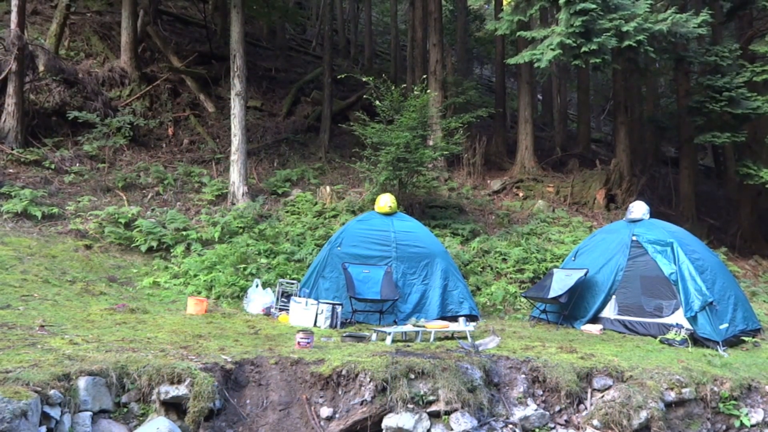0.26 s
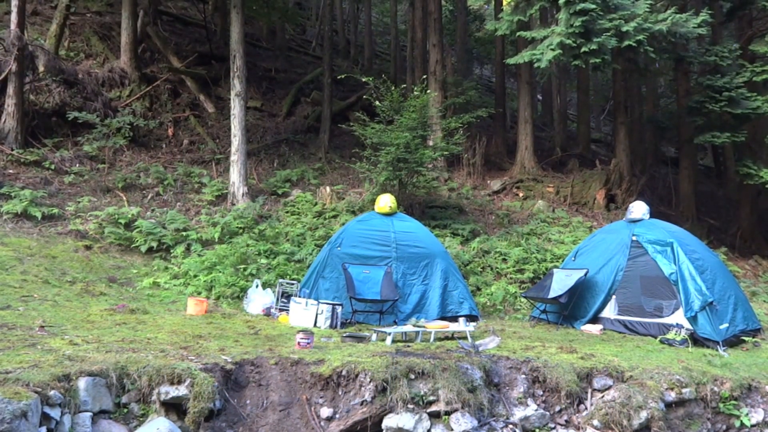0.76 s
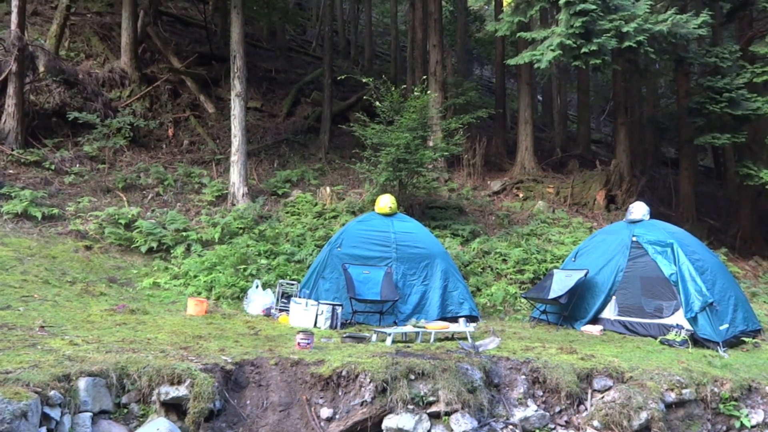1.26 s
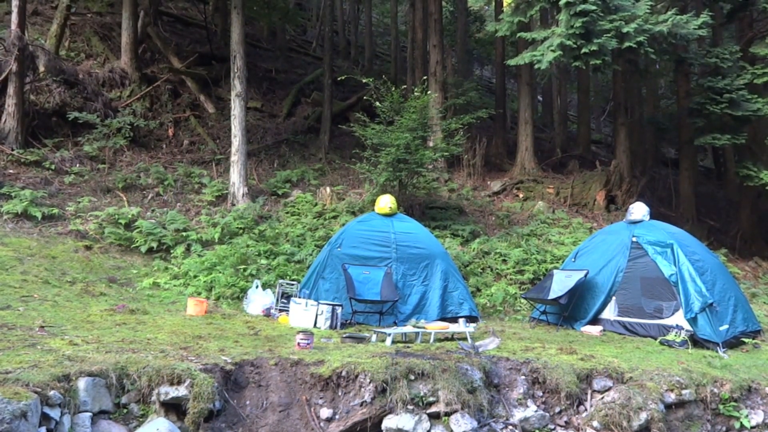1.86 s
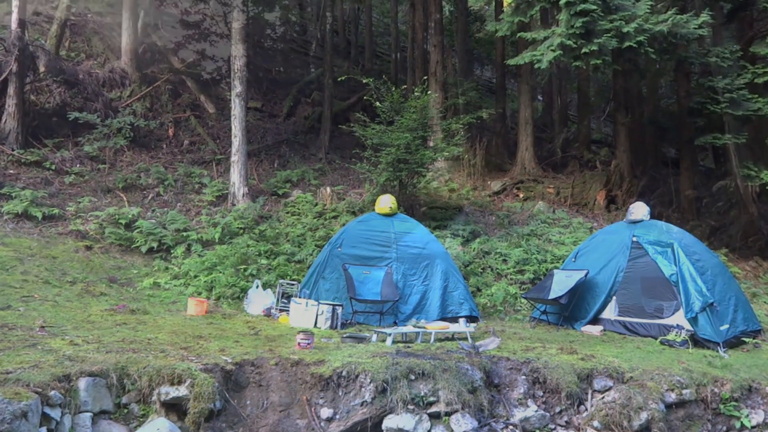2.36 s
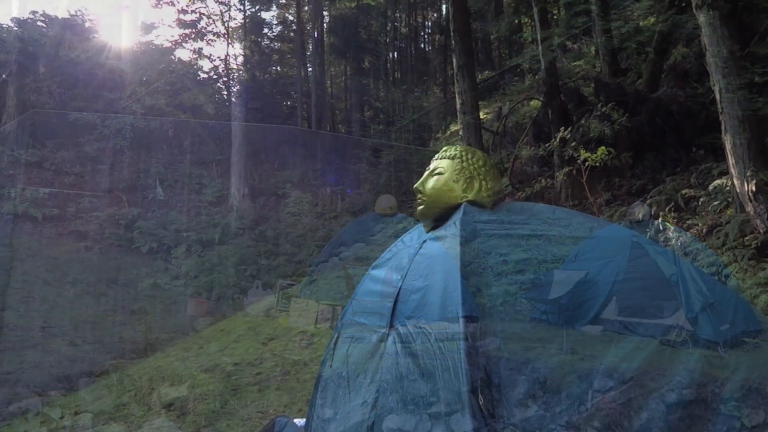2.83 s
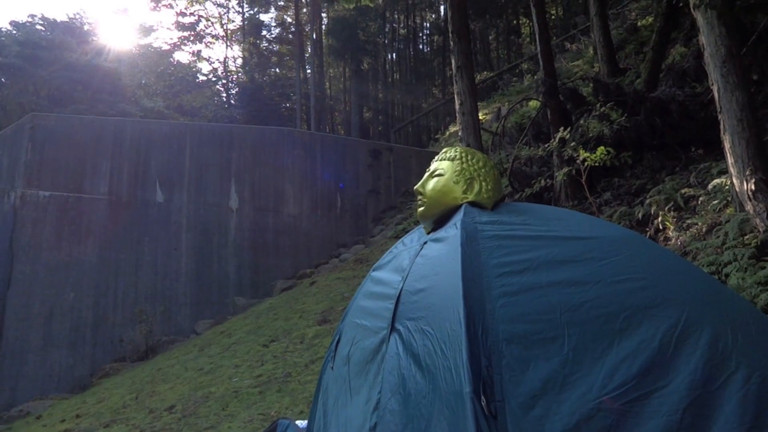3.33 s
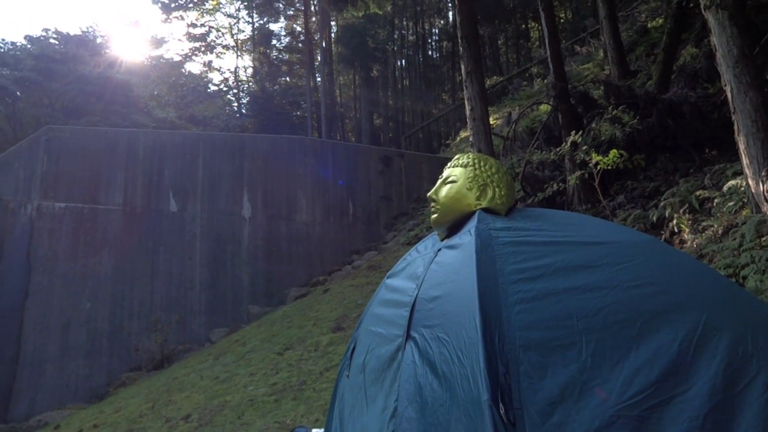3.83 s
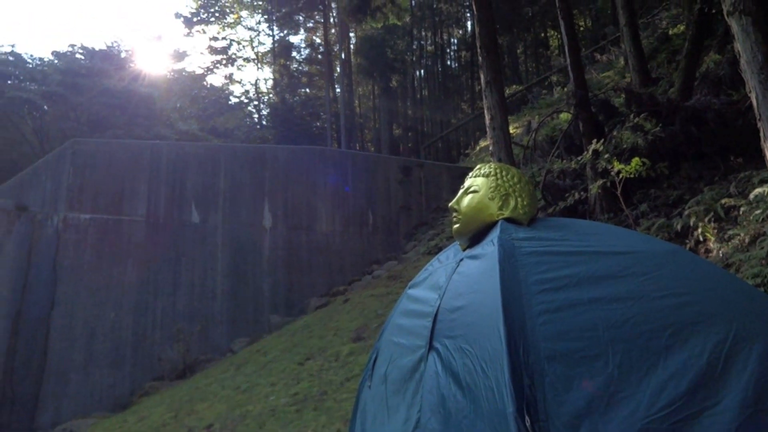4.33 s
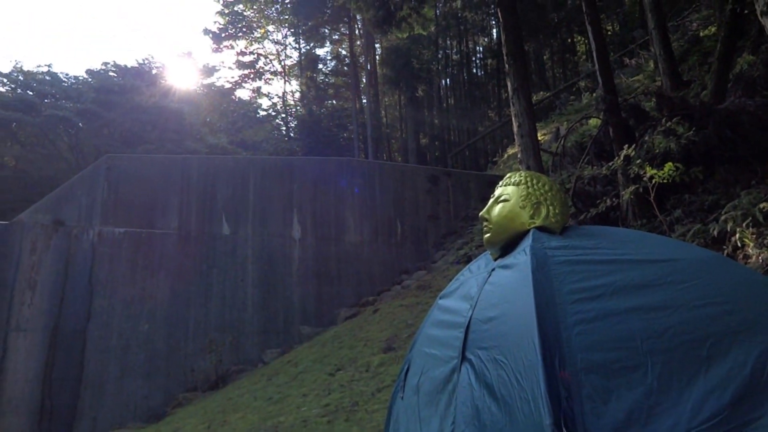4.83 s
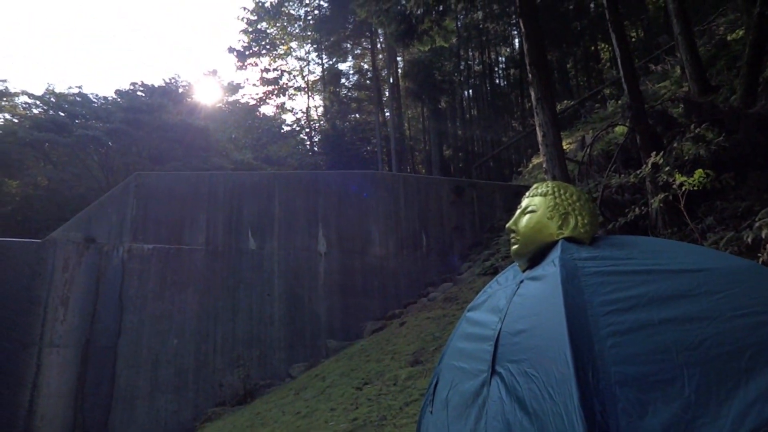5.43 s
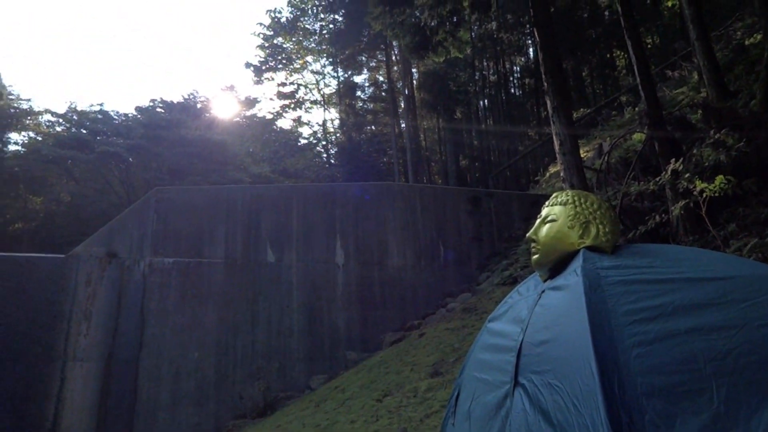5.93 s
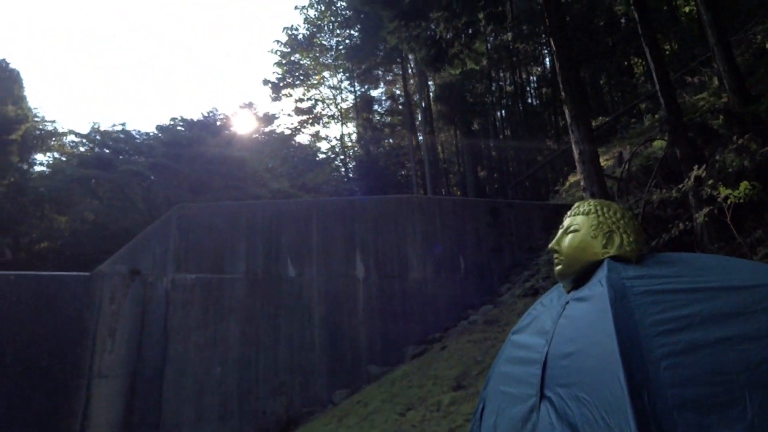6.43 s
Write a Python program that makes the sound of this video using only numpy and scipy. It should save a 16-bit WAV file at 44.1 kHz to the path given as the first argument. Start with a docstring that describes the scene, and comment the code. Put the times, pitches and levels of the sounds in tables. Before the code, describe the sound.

A rocky mountain stream rushes and gurgles close by with bright plops and splashes, then fades over to a quieter, smoother, more distant rush.

```python
"""Mountain stream over rocks

A rush is heard from close by, then fades over to a quieter, more distant spot; churning water joins there.
Each rush is filtered noise (white water) plus a swarm of decaying, gliding sines (air bubbles).
Single plops, rising glugs and splashes, made of sines and short noise bursts, stand out.
A stereo pair of microphone ports hears it, a little stronger on the left."""
import sys
import numpy as np
from scipy import signal
from scipy.fft import rfft, irfft
from scipy.io import wavfile

SR = 44100
rng = np.random.default_rng(int(sys.argv[2]) if len(sys.argv) > 2 else 0)


def put_to_file(sound):
    """Save the sound as 16-bit audio at rate SR, in the file named by the first command-line argument."""
    columns = np.atleast_2d(sound).T  # one column per channel
    safe = np.clip(columns, -1, 1)
    whole_steps = np.round(safe * 32767)
    wavfile.write(sys.argv[1], SR, whole_steps.astype(np.int16))


N = 294588
HZ = np.fft.rfftfreq(N, 1 / SR)

# how the two ports hear the distant spot:
# (frequency [Hz], coherence [0-1], left minus right [dB], phase lead of the left [rad])
FAR_IMAGE = [(60, 0.35, 1, 0.5), (308, 0.63, 1.5, 1), (513, 0.14, 2.5, -1.5), (810, 0.71, 3.8, 0.36),
             (1133, 1, 1, -1.3), (1430, 0.28, 4.3, 2.5), (1540, 0.52, 6.8, 3.5), (1970, 0.69, 6.8, 4),
             (2370, 0.76, 2.8, 6.5), (3020, 0.79, 3.5, 6), (4600, 1, 2.9, 6.5), (9000, 1, 3.8, 6.5),
             (15000, 1, 1.2, 6.5)]


def gain_of(db):
    """Decibel law: 20 dB is a factor of ten in amplitude."""
    return 10 ** (np.asarray(db) / 20)


def evened(x):
    """Normalization to unit rms."""
    return x / np.sqrt(np.mean(x ** 2) + 1e-20)


def read(table, hz):
    """Linear interpolation of every table column along a log-frequency axis."""
    f, *columns = np.transpose(table)
    return [np.interp(np.log(hz + 1), np.log(f + 1), column) for column in columns]


def add(mix, s, sound):
    """Superposition: adds a sound to the mix, in place, from time s."""
    part = mix[max(round(s * SR), 0):][:len(sound)]
    part += sound[:len(part)]


def ramp(start_s, length_s):
    """Linear amplitude rise from 0 to 1, which then holds."""
    return np.clip((np.arange(N) / SR - start_s) / length_s, 0, 1)


def lumps(shape, span_s, span_hz):
    """Gaussian-smoothed random field of unit rms over time frames and frequency bins."""
    along_s = np.fft.fftfreq(shape[0], 128 / SR)[:, None] * span_s
    along_hz = np.fft.fftfreq(shape[1], SR / 512) * span_hz
    blur = np.exp(-along_s ** 2 - along_hz ** 2)
    spectrum = np.fft.fft2(rng.standard_normal(shape))
    return evened(np.fft.ifft2(spectrum * blur).real)


def froth(patchy_db, flicker_db, surge_db):
    """Modulated noise: two independent strands share patches of spray, quick flicker and slower surges."""
    shape = (N // 128 + 5, 257)
    # each depth is the rms level swing; its sign does not matter
    level_db = patchy_db * lumps(shape, span_s=0.042, span_hz=940)
    level_db = level_db + flicker_db * lumps(shape, span_s=0.0059, span_hz=9300)
    level_db = level_db + surge_db * lumps(shape, span_s=0.1, span_hz=11000)
    noise = rng.standard_normal((2, *shape)) + 1j * rng.standard_normal((2, *shape))
    spectrogram = np.swapaxes(noise * gain_of(level_db), 1, 2)
    strands = signal.istft(spectrogram, nperseg=512, noverlap=384)[1]
    return evened(strands[:, :N])


def bubble(hz, t60, rise=0.057, onset_cycles=2.4):
    """Bubble resonance: trapped air rings and decays, its pitch rising as it nears the surface."""
    t = np.arange(0, t60, 1 / SR)
    decay = gain_of(-60 * t / t60)
    onset = 1 - np.exp(-t * hz / onset_cycles)
    # the pitch climbs by twice the rise, as a share of hz
    cycles = hz * t * (1 + rise * (t / t60 - .5))
    return decay * onset * np.sin(2 * np.pi * cycles)


def swarm(lo_hz, hi_hz, per_s, spread_db, cycles, glide=0.1, count=70):
    """Random superposition: bubbles of many sizes and strengths give even power per hertz."""
    out = np.zeros(N)
    per_pitch = int(np.clip(per_s * N / SR / count, 1, 400))
    for hz in np.geomspace(lo_hz, hi_hz, count):
        when, strength, polarity = rng.random((3, per_pitch))
        # exponential levels: a positive spread makes a few strong, a negative one a few faint
        level_db = spread_db * np.minimum(-np.log(1 - strength), 4)
        size = gain_of(level_db) * np.sign(polarity - .5)
        clicks = np.bincount((when * N).astype(int), size, N)
        ring = bubble(hz, cycles * rng.uniform(0.49, 1.25) / hz, glide * rng.random())
        # log-spaced pitches need power in proportion to frequency
        out += signal.oaconvolve(clicks, np.sqrt(hz) * ring / np.linalg.norm(ring))[:N]
    return evened(out) * np.sqrt(2 * (hi_hz - lo_hz) / SR)


def banks(x, wet_db=-10, t60=0.1):
    """Diffuse scattering: rocks and banks put a short, decaying noise tail behind each sound."""
    t = np.arange(SR // 3) / SR
    tail = rng.standard_normal(len(t)) * gain_of(-60 * t / t60)
    tail = tail * (1 - np.exp(-t / 0.0089))
    return x + gain_of(wet_db) * signal.oaconvolve(x, tail / np.linalg.norm(tail))[:N]


def colour(wash, rocks):
    """Spectral shaping: the broad wash curve with peaks and notches from echoes between the rocks."""
    level_db = read(wash, HZ)[0]
    for hz, width, db in rocks:
        level_db = level_db + db * np.exp(-((HZ - hz) / width) ** 2)
    return gain_of(level_db)


def ports(shared, diffuse, image):
    """Interchannel coherence: both ports hear the shared sound alike, the diffuse one in opposition."""
    alike, balance_db, lead = read(image, HZ)
    alike = np.clip(alike, 0, .998)
    mid = rfft(shared) * np.sqrt(1 + alike)
    side = rfft(diffuse) * np.sqrt(1 - alike)
    left_gain = gain_of(balance_db)
    left = (mid + side) * left_gain
    right = (mid - side) * np.exp(-1j * lead)
    return irfft(np.array([left, right]) / np.sqrt(1 + left_gain ** 2), N)


def stream(foam, bubbles, tone, image):
    """Linear filtering: foam and bubbles take the tone and stereo image of one spot, at unit rms."""
    foam = foam + np.array([banks(bubbles), np.zeros(N)])
    shared, diffuse = irfft(rfft(foam) * tone, N)
    return evened(ports(shared, diffuse, image))


def near_stream():
    """Noise and bubble resonance close by: low gurgling, a thin trickle and bright tinkling in the rush."""
    # white water spectrum: (frequency [Hz], relative level per hertz [dB])
    near_wash = [(30, -40), (130, -35), (260, -23), (380, -11.5), (820, -1), (1320, -2.5), (1530, 0.8),
                 (2000, -4), (2900, -5.5), (3600, -3.5), (4800, -7.5), (7000, -8.5), (10000, -14.5),
                 (15000, -28.5)]
    # peaks and notches from rock echoes: (frequency [Hz], half width to 1/e [Hz], level [dB])
    near_rocks = [(685, 59, -1.5), (834, 60, 0), (970, 34, 1), (1350, 70, -1.5), (2400, 240, 1),
                  (3170, 85, -1), (3590, 30, 3.5), (3940, 95, 2), (4600, 220, -1.6), (5300, 190, 2.5),
                  (8700, 220, 1)]
    # hearing at the ports:
    # (frequency [Hz], coherence [0-1], left minus right [dB], phase lead of the left [rad])
    near_image = [(60, 0.35, 0.6, 0.09), (380, 0.77, 1.5, -0.1), (1030, 0.96, 1.5, -0.23),
                  (1280, 0.8, 2.5, -0.29), (1560, 0.08, 6, -0.7), (1990, 0.56, 1.5, -0.4),
                  (2300, 0.97, 3.4, 0.1), (2780, 0.62, 4.9, -0.61), (3620, 0.91, 4, 0),
                  (6800, 0.97, 6.5, -0.01), (8700, 0.83, 6, -0.3), (10800, 0.29, 5, -0.18),
                  (13900, 1, -0.6, -0.01)]
    gurgle = gain_of(-5.5) * swarm(318.0, 2005, per_s=330, spread_db=2.0, cycles=18.4, glide=0.34)
    trickle = gain_of(-10.5) * swarm(3380, 4160, per_s=80, spread_db=-0.3, cycles=130, count=14)
    tinkle = gain_of(-11.0) * swarm(1970, 8980, per_s=700, spread_db=2.0, cycles=36)
    foam = froth(patchy_db=1.0, flicker_db=1.12, surge_db=-0.2)
    tone = colour(near_wash, near_rocks)
    return gain_of(-35.5) * stream(foam, gurgle + trickle + tinkle, tone, near_image)


def plop(db, hz, rise=0.065):
    """Bubble damping: the lower the pitch of a large bubble, the longer it rings."""
    t60_at_1khz, size_power = 0.061, 0.36
    return gain_of(db) * bubble(hz, t60_at_1khz * (hz / 1000) ** -size_power, rise)


def plops():
    """Bubble resonance: the largest bubbles ring one by one."""
    # (time [s], level [dB], pitch [Hz], half the upward glide [share of pitch])
    large_bubbles = [(.03, -29.5, 897, .04), (.078, -39, 3100, .04), (.083, -27.5, 2240, .2),
                     (.086, -38, 524, 0.11), (.091, -31, 2580, .08), (.163, -29, 840, 0.072),
                     (.183, -34, 846, .04), (.22, -29, 2090, .04), (.29, -30, 794, .04),
                     (.479, -26, 2350, 0.044), (.506, -34, 1510, .08), (.607, -29.5, 802, .04),
                     (.617, -30, 845, 0.039), (.65, -36, 520, .06), (.673, -30, 2560, 0.19),
                     (.68, -32, 920, 0.16), (.711, -29, 850, .04), (.979, -33.5, 534, .04),
                     (.982, -32, 840, .04), (1.085, -33, 650, .08), (1.091, -34, 1910, .04),
                     (1.141, -28.5, 1180, 0.093), (1.163, -33, 1520, .04), (1.203, -33, 1000, .04),
                     (1.259, -29.5, 3800, .02), (1.263, -31, 2220, .04), (1.345, -36, 2620, .04),
                     (1.386, -30.5, 2260, .08), (1.502, -32.5, 1640, .04), (1.706, -42, 450, .06),
                     (1.772, -28.5, 867, .04), (1.952, -28.5, 952, .04), (2.079, -33, 2360, .04),
                     (2.222, -37.5, 553, .04), (2.26, -32, 2390, .04), (2.325, -29, 3650, .04),
                     (2.386, -32, 3960, .04), (2.903, -36, 810, 0.034), (3.144, -45, 1750, .04),
                     (3.182, -40, 773, .08), (3.234, -40, 910, .04), (3.248, -45, 3120, .04),
                     (3.268, -41, 1740, 0.054), (3.27, -44, 2330, .06), (3.311, -36, 1290, .06),
                     (3.648, -41, 790, 0.043), (3.93, -41, 720, .04), (4.165, -41, 860, .04),
                     (4.203, -35.5, 915, .08), (4.239, -40, 1114, .06), (4.313, -41, 1636, .04),
                     (4.372, -42, 1465, .06), (4.516, -37, 1780, .04), (4.97, -37.5, 770, 0.051),
                     (5.044, -40, 900, .04), (5.211, -36, 1295, .04), (5.253, -41, 1465, .06),
                     (5.28, -42, 2025, .04), (5.478, -41, 1035, .06), (5.583, -38, 1545, .04),
                     (5.629, -38, 3050, .04), (5.66, -43, 3100, .04), (5.778, -42, 820, .06),
                     (5.955, -40, 2560, .04), (6.054, -39, 905, .06), (6.417, -39, 1700, .04),
                     (6.555, -35, 1225, .04)]
    out = np.zeros(N)
    for s, db, hz, rise in large_bubbles:
        add(out, s, plop(db, hz, rise))
    return out


def stray_plops(per_s, db, hz, octaves, spread_db=3.0, count=60):
    """Random arrivals: lesser plops after gamma-distributed waits, scattered in level and pitch."""
    out = np.zeros(N)
    waits = rng.gamma(2, 1 / 2, count) / per_s
    scatter = rng.uniform(-0.67, 1, (count, 2))
    for s, (strength, height) in zip(np.cumsum(waits), scatter):
        add(out, s, plop(db + spread_db * strength, hz * 2 ** (octaves * height)))
    return out


def panned(sound, pan_db):
    """Level-difference panning: positive leans left, with a faint tail from the banks."""
    port = gain_of([[pan_db / 2], [-pan_db / 2]])
    return port / np.sqrt(np.mean(port ** 2)) * banks(sound, wet_db=-20)


def splash(hz, length, octaves, count=8):
    """Impact noise: a slap swells quickly as band-limited spray, with droplets ringing in it."""
    droplet_share, droplet_cycles = 0.26, 41  # share of the power; cycles to fall 60 dB
    u = np.arange(SR // 4) / SR / (length / 2)  # the spray peaks at u = 1
    f = np.fft.rfftfreq(len(u), 1 / SR)
    band = np.exp(-(np.log2((f + 1) / hz) / octaves) ** 2)
    noise = irfft(rfft(rng.standard_normal(len(u))) * band, len(u))
    spray = evened(noise) * u * np.exp(1 - u)
    droplets = np.zeros(len(u))
    for delay, height in rng.random((count, 2)):
        pitch = hz * 2 ** (octaves * (height - .5))
        add(droplets, 1.3 * length * delay, np.exp(-delay) * bubble(pitch, droplet_cycles / pitch))
    droplets = np.std(spray) * evened(droplets)
    return np.sqrt(1 - droplet_share) * spray + np.sqrt(droplet_share) * droplets


def splashes():
    """Impact noise across the stereo field: the hardest slaps of water on rock."""
    # (time [s], level [dB], centre [Hz], twice the time to the spray's peak [s],
    #  half width to 1/e [octaves], left minus right [dB])
    slaps = [(0.069, -35, 3000, .013, 0.49, 5), (0.464, -39, 1400, 0.022, 1.05, 3),
             (0.798, -35, 3150, 0.011, 0.55, 9), (0.918, -41, 4350, 0.0086, 0.23, 6),
             (0.93, -38, 3300, .007, .4, 7), (1.083, -36.5, 1110, 0.014, .94, 3),
             (1.124, -39, 1500, .009, .5, 3), (1.137, -35, 1220, 0.012, .7, 3),
             (1.944, -40, 650, .011, .5, 3), (1.955, -38, 1660, 0.013, 0.32, 4),
             (1.998, -40, 6500, 0.011, .35, 6), (2.076, -36, 2900, .009, .6, 10),
             (2.111, -38.5, 3800, 0.01, 1.1, 8), (2.33, -41.5, 6600, .01, 0.29, 5),
             (2.883, -38, 1630, 0.0075, 0.67, -13), (3.266, -38, 1850, .0074, .55, 9),
             (3.65, -44.5, 1100, 0.0059, .35, 6), (4.199, -40, 1190, .011, 0.79, 3),
             (5.629, -45, 2600, 0.0061, .4, 6)]
    out = np.zeros((2, N))
    for s, db, hz, length, octaves, pan_db in slaps:
        slap = np.zeros(N)
        add(slap, s, gain_of(db) * splash(hz, length, octaves))
        out += panned(slap, pan_db)
    return out


def glug(db, from_hz, to_hz, length, swell=.6):
    """Cavity resonance: an air pocket shrinks as it escapes, so its swelling note slides upward."""
    u = np.arange(0, length, 1 / SR) / length
    hz = from_hz * (to_hz / from_hz) ** u
    envelope = abs(np.sin(np.pi * u)) ** swell
    return gain_of(db) * envelope * np.sin(2 * np.pi * np.cumsum(hz) / SR)


def glugs():
    """Cavity resonance: air squeezed up between stones gives drawn-out rising notes."""
    # (time [s], level [dB], start pitch [Hz], end pitch [Hz], length [s])
    rising_notes = [(1.448, -37.5, 3300, 4250, 0.034), (1.470, -44.5, 487, 650, 0.023),
                    (1.85, -43, 460, 526, .04), (1.908, -39.5, 596, 686, 0.042),
                    (3.18, -41.5, 854, 906, 0.026), (4.098, -43.5, 860, 890, 0.057)]
    out = np.zeros(N)
    for s, *shape in rising_notes:
        add(out, s, glug(*shape))
    return out


def far_stream():
    """Noise and bubble resonance far off: a smoother rush with babble, hollow gulps, fizz and fine drips."""
    # white water spectrum: (frequency [Hz], relative level per hertz [dB])
    far_wash = [(30, -35), (120, -38), (350, -17), (580, -14), (850, -5.5), (1030, -7.5), (1400, -3.5),
                (1650, 0), (2200, -7), (3600, -11.5), (4400, -11), (5000, -14), (9000, -16.5),
                (15000, -29.5)]
    # peaks and notches from rock echoes: (frequency [Hz], half width to 1/e [Hz], level [dB])
    far_rocks = [(480, 43, -0.5), (850, 23, 2.5), (1200, 130, 1.5), (1410, 69, -0.5), (1597, 42, 2),
                 (1950, 84, 3.5), (3060, 120, 2), (3570, 120, -1.5), (4430, 150, 1), (5000, 290, -1.1),
                 (6500, 540, 1.6), (10800, 1100, 2)]
    babble = gain_of(-7.0) * swarm(221.0, 2240, per_s=420, spread_db=3.0, cycles=19.0, glide=0.21)
    gulps = gain_of(-7) * swarm(826, 892, per_s=16, spread_db=-1.0, cycles=51, count=8)
    fizz = gain_of(-10.5) * swarm(2136, 8820, per_s=600, spread_db=1.0, cycles=49)
    drips = gain_of(-14.5) * swarm(2388, 7470, per_s=60, spread_db=2.5, cycles=84, count=40)
    foam = froth(patchy_db=0.8, flicker_db=.5, surge_db=0.11)
    tone = colour(far_wash, far_rocks)
    return gain_of(-41.5) * stream(foam, babble + gulps + fizz + drips, tone, FAR_IMAGE)


def churn(hz=2200, octaves=1.0):
    """Band-limited noise and bubbles: another run of the distant rapids swells, then holds."""
    band = np.exp(-(np.log2((HZ + 1) / hz) / octaves) ** 2)
    bubbles = gain_of(1) * swarm(1220, 3530, per_s=260, spread_db=0.5, cycles=15, count=30)
    foam = froth(patchy_db=3.0, flicker_db=-2.2, surge_db=-3.5)
    rush = stream(foam, bubbles, band, FAR_IMAGE)
    return gain_of(-56) * ramp(start_s=3.1, length_s=0.63) * rush


def scene():
    """Linear crossfade between the two spots, with plops, glugs and splashes superposed."""
    far = ramp(start_s=2.127, length_s=1)
    near = 1 - far
    water = near * near_stream() + far * (far_stream() + churn())
    drops = near * stray_plops(per_s=3, db=-43, hz=1202, octaves=1.8)
    drops += far * stray_plops(per_s=2.9, db=-50, hz=1000, octaves=1.5)
    drops += plops() + glugs()
    return water + panned(drops, pan_db=3.5) + splashes()


def record(dry):
    """Low-pass filtering: the recorder's band limit."""
    edge_hz = 15400
    lowpass = signal.firwin(511, edge_hz, window=("kaiser", 9), fs=SR)
    return signal.oaconvolve(dry, lowpass[None], "same")


dry = scene()
out = record(dry)
put_to_file(out)
```